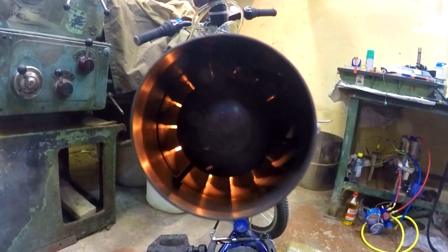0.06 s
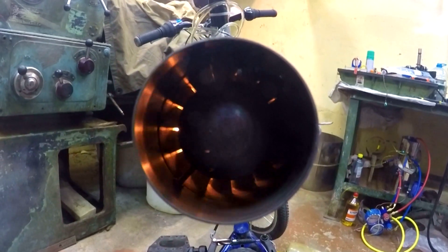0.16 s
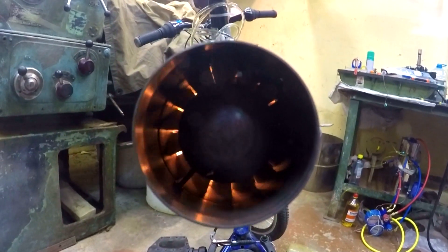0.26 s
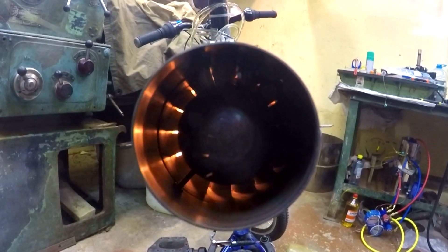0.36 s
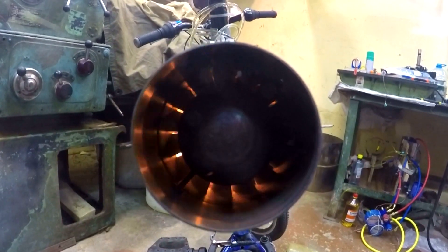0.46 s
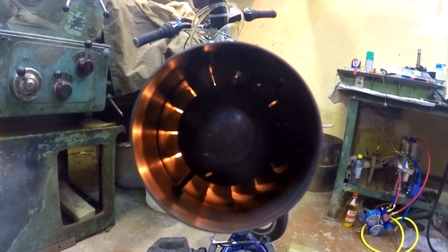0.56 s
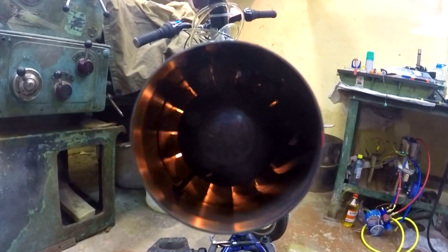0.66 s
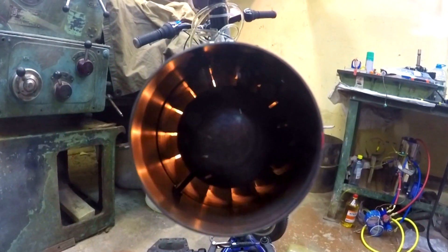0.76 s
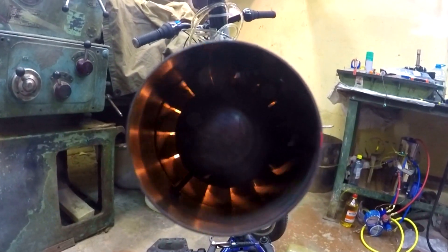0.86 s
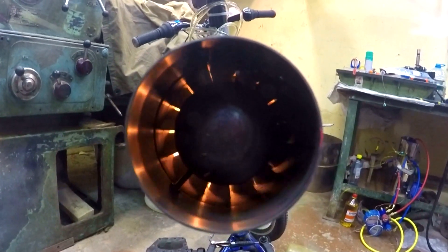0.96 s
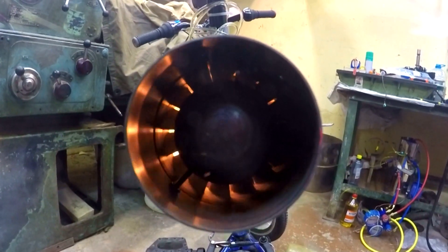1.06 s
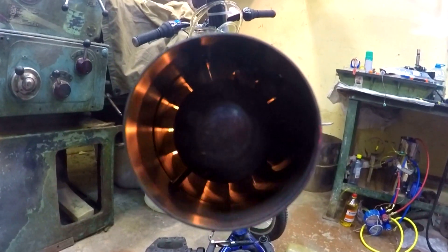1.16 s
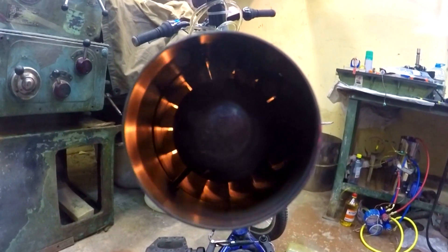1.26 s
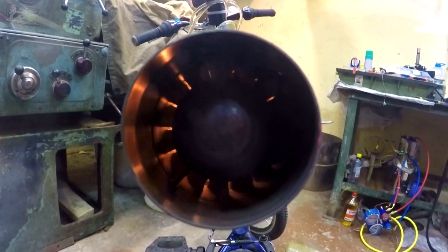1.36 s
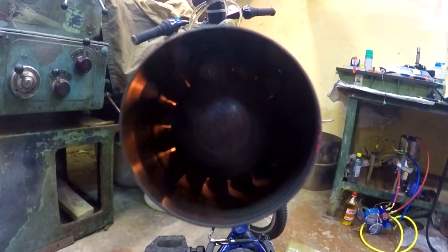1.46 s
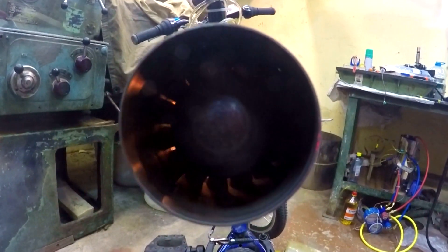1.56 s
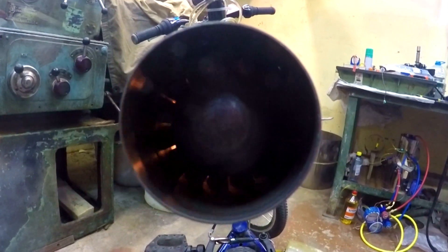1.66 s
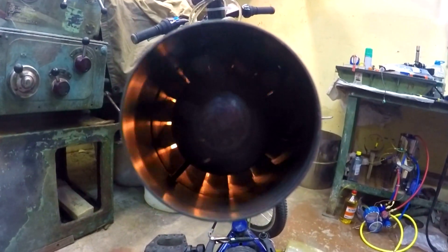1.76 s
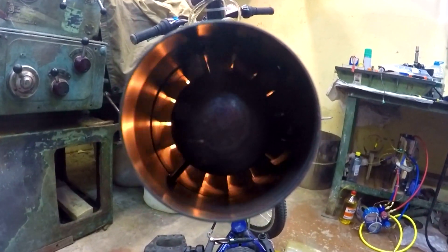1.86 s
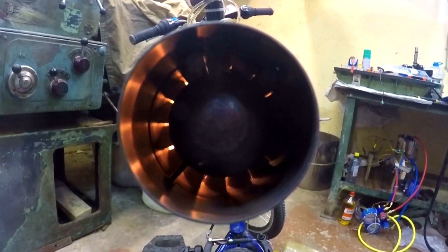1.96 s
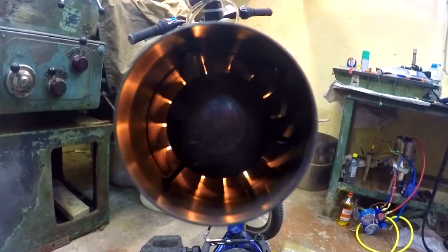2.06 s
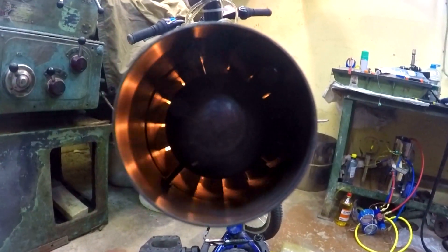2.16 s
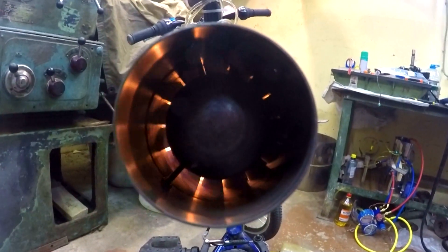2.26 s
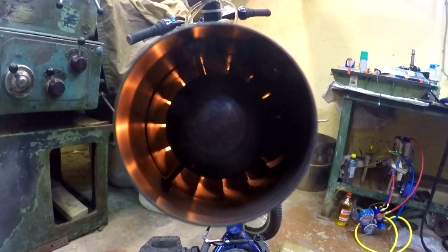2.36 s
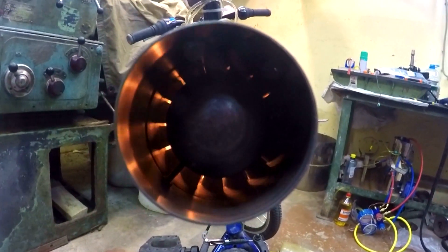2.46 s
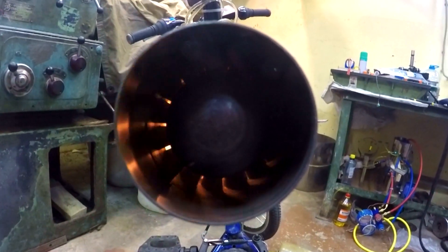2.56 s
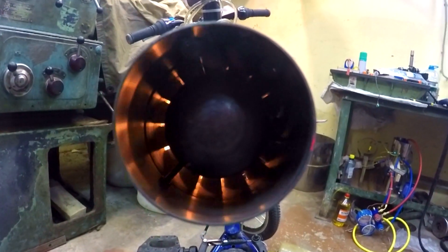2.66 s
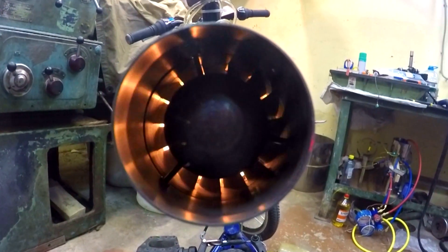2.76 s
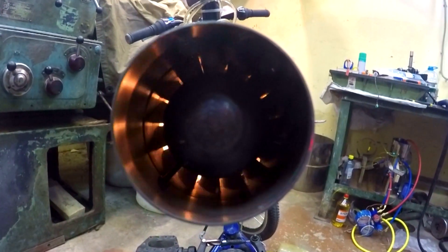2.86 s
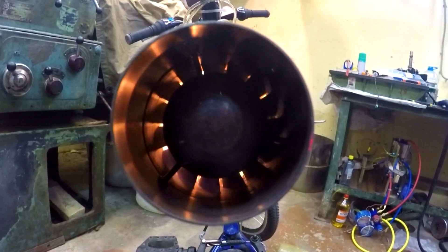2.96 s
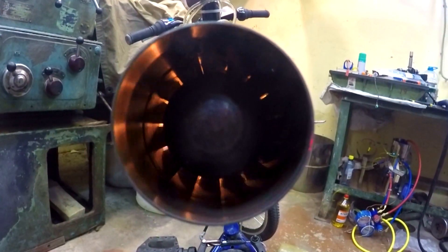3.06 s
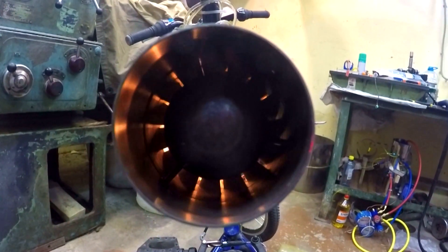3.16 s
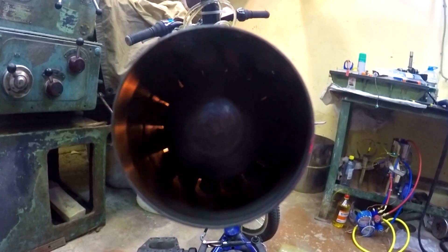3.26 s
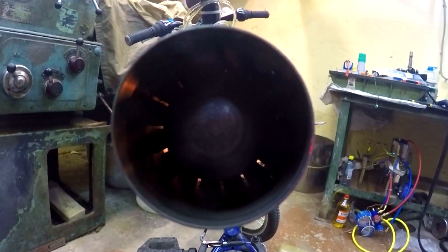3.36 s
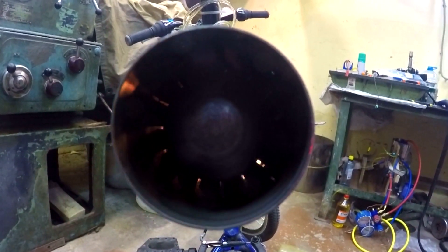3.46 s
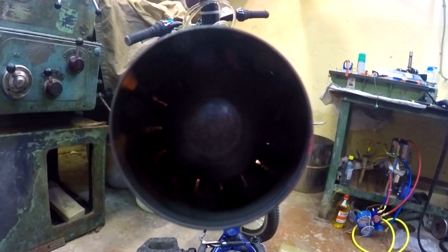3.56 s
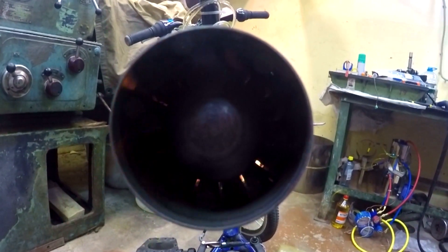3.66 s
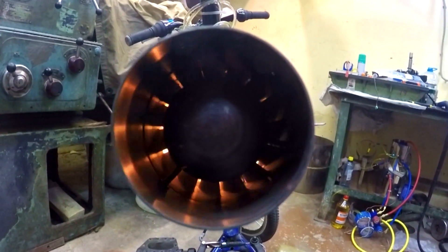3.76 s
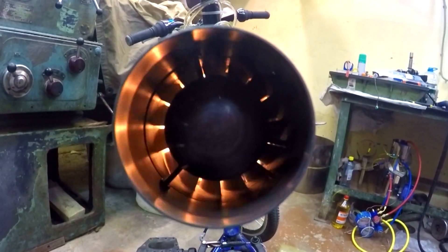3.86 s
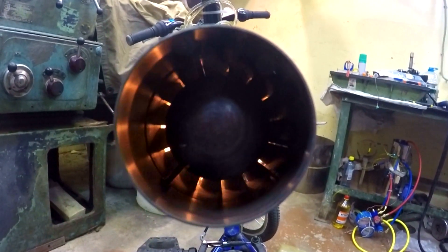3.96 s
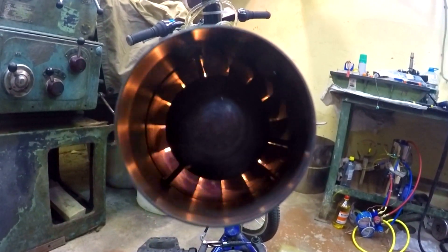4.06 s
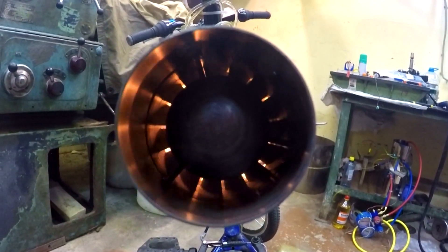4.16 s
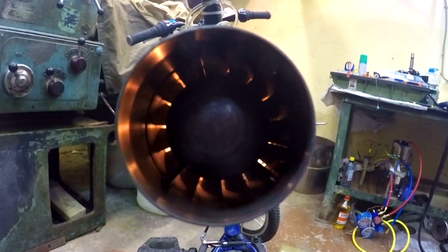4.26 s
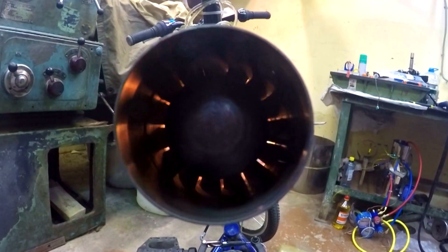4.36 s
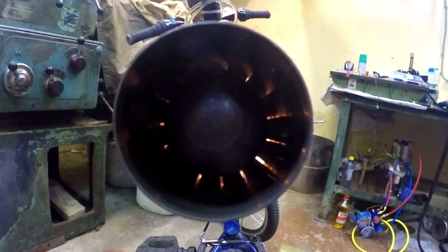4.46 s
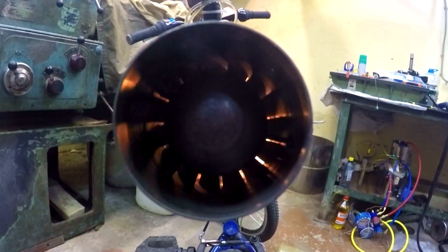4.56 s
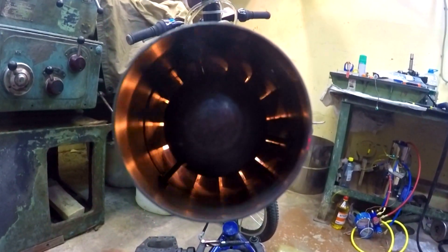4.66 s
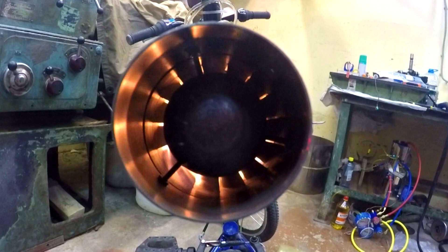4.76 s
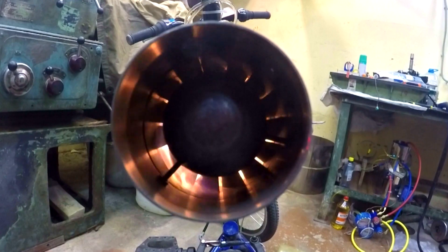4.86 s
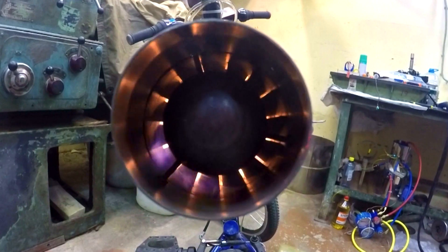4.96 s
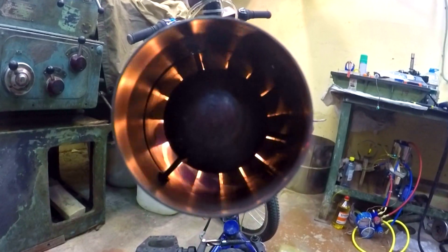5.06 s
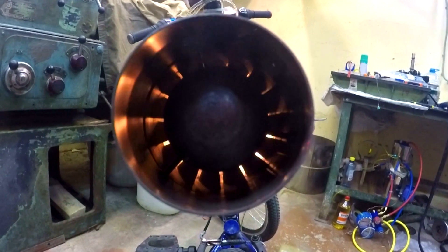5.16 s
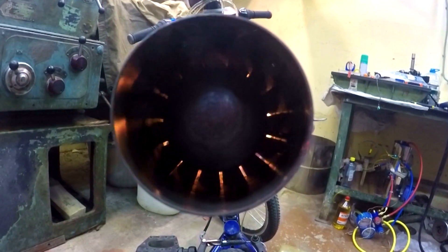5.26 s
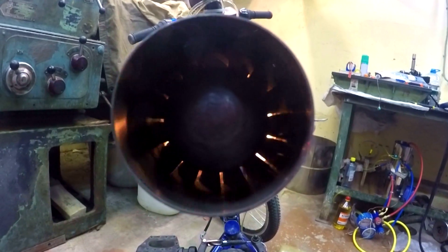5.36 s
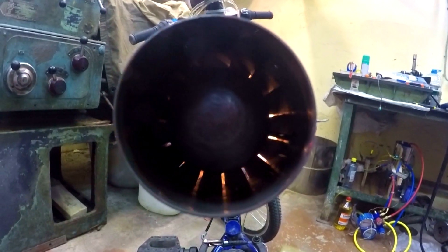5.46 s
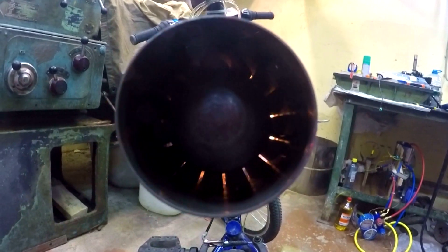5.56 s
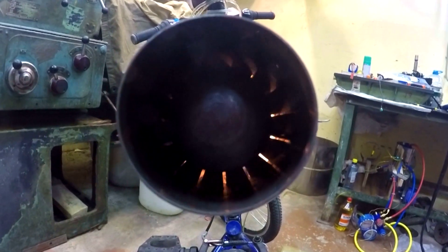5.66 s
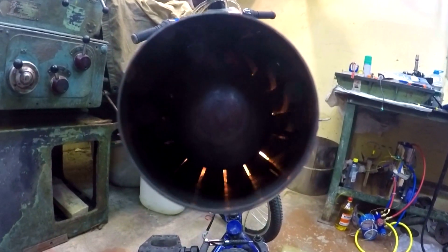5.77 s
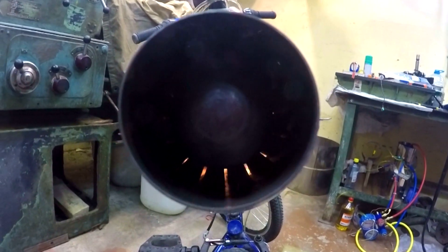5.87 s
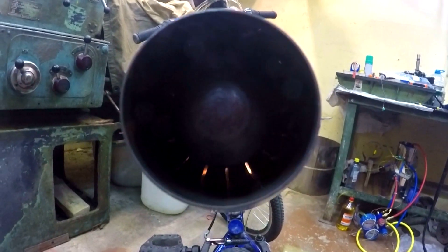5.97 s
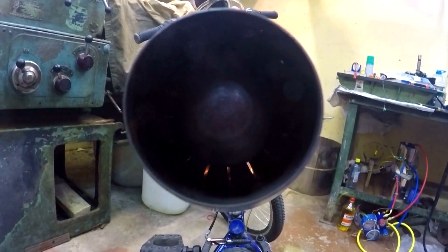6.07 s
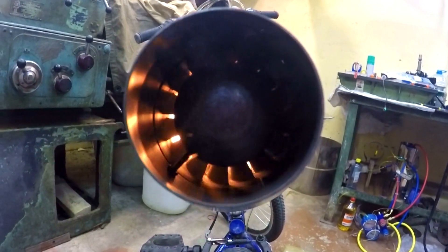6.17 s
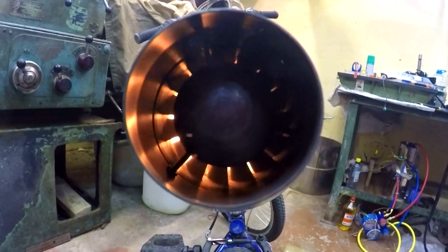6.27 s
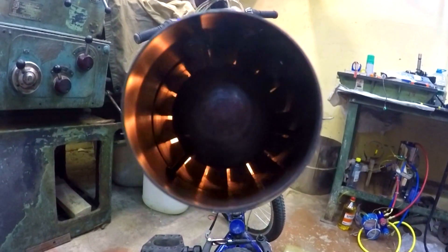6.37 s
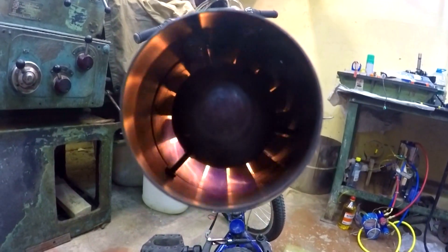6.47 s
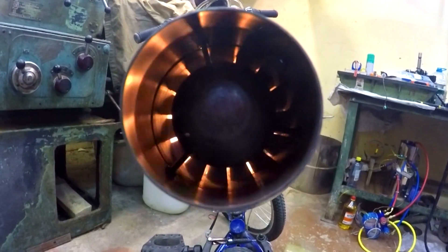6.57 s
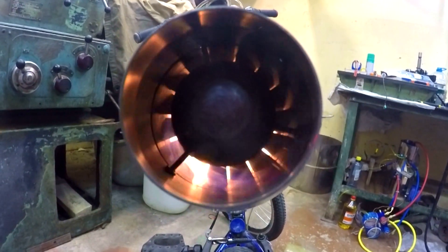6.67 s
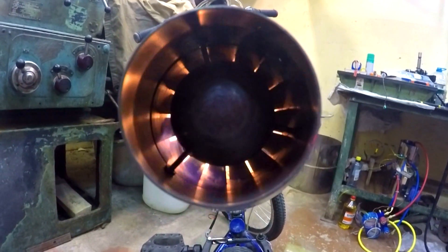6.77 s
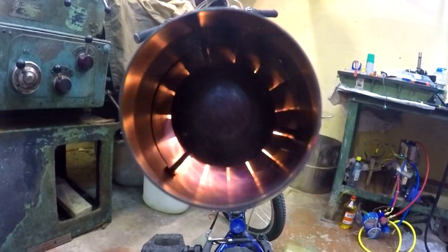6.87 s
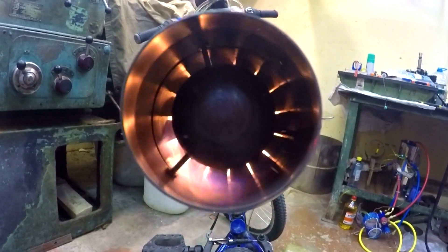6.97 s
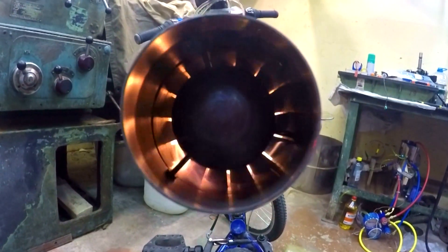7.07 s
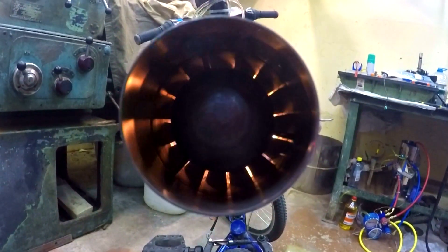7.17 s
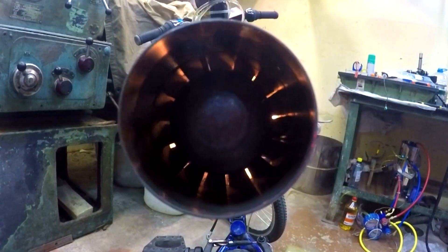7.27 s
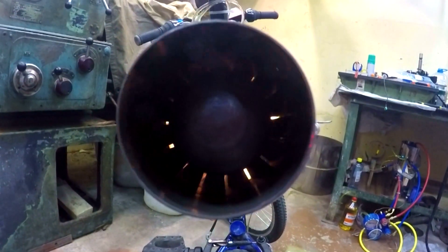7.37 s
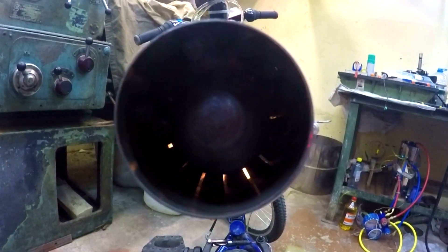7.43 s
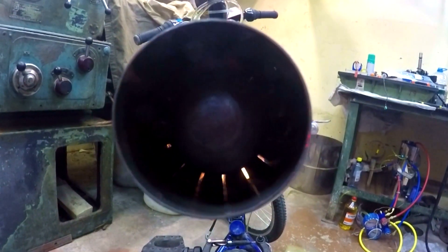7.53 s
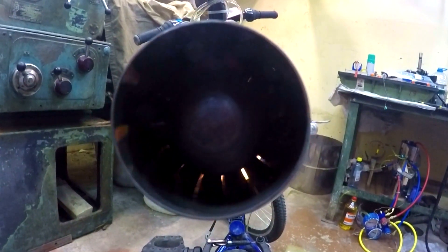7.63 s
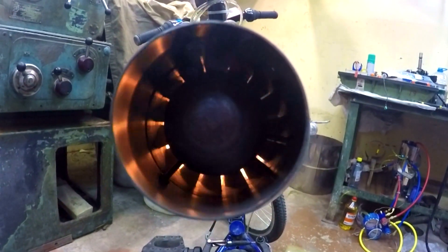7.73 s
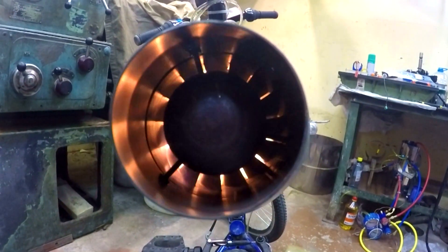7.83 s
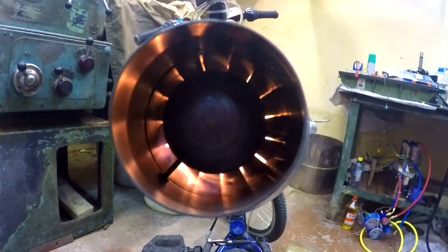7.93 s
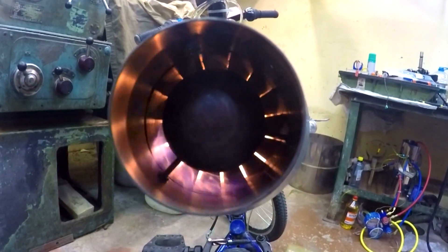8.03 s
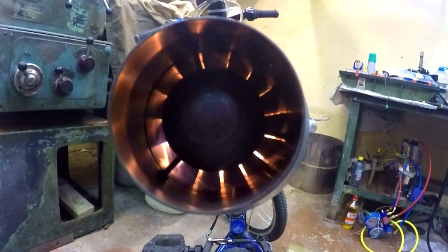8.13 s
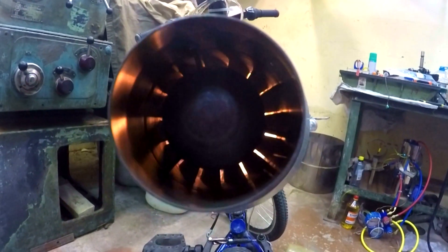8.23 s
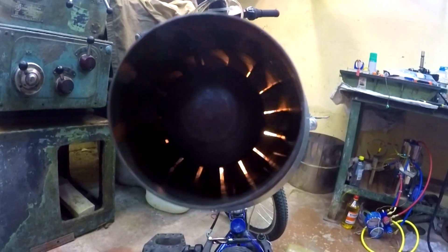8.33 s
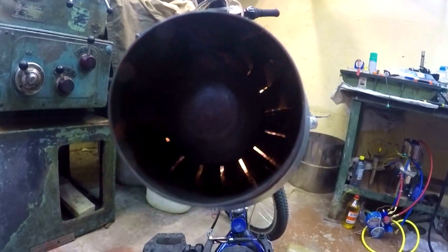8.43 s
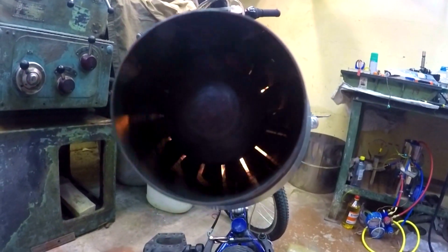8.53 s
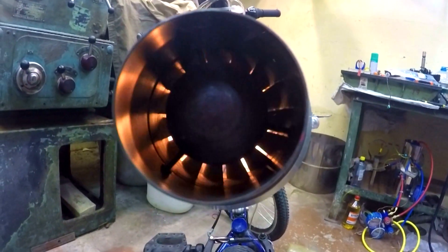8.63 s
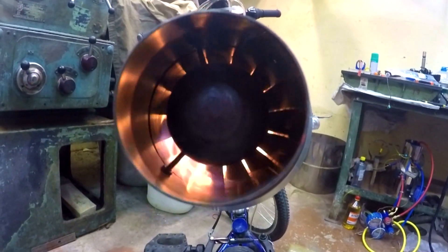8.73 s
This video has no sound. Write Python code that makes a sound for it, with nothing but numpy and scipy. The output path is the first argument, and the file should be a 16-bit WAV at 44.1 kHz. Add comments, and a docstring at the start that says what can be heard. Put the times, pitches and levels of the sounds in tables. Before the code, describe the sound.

Tail-pipe roar of a small jet engine pulses and swells indoors, with a piercing rising whine, rushing air and faint igniter ticks.

```python
"""Small turbine engine spooling up

A small turbine engine speeds up in a workshop, heard from behind its tail pipe. The flame is noise through a
moving pipe resonance plus wider noise bands. The rotor whines on multiples of the shaft speed, a ball bearing
sings as a train of clicks, rushing air is coloured noise, and an igniter ticks with short noise bursts.
An automatic gain control turns everything down when the sound surges."""
import sys
import numpy as np
from scipy import signal
from scipy.fft import rfft, irfft, next_fast_len
from scipy.io import wavfile
from scipy.ndimage import uniform_filter1d

SR = 44100
rng = np.random.default_rng(int(sys.argv[2]) if len(sys.argv) > 2 else 0)


def wav_out(sig):
    """Save sig, one row per channel (or a flat mono array), as 16-bit PCM at SR to the path in sys.argv[1]."""
    wavfile.write(sys.argv[1], SR, np.round(np.clip(np.atleast_2d(sig).T, -1, 1) * 32767).astype(np.int16))


N = 388080  # samples, 8.8 s

# speed of the shaft: t/s, speed/(turns/s)
SHAFT_SPEED = [(0.0, 57.88), (0.3, 60.55), (0.7, 64.15), (1.0, 66.28), (1.4, 68.68), (1.8, 70.33),
               (2.3, 72.66), (2.7, 74.1), (3.15, 76.1), (3.8, 77.05), (4.25, 78.62), (4.65, 79.27),
               (5.25, 81.5), (5.8, 82.13), (6.25, 81.7), (6.8, 83.08), (7.25, 85.2), (7.8, 84.5),
               (8.3, 86.0), (8.8, 85.5)]
FULL_TURNS = 85  # turns/s at which the air levels are stated

# colour of the air in the duct, in the throat and in the compressor hiss: f/Hz, level/dB
DUCT_COLOUR = [(500, -120), (900, -0.5), (1180, -2), (1300, 0), (1450, -3.5), (1560, -6.5), (1750, -21),
               (2000, -23), (3000, -120)]
THROAT_COLOUR = [(1300, -120), (1900, -2.5), (2150, -2.5), (2350, 1.5), (2650, -6.5), (3100, -3),
                 (3400, -8.5), (3800, -4), (4100, -3), (5000, -120)]
HISS_COLOUR = [(2500, -120), (3300, 7.5), (3700, 7), (4100, 5.5), (4500, 4.5), (5000, 8.5), (5600, 3),
               (6200, 1), (7500, -2), (8100, -3.5), (9500, -4), (11000, -7.5), (13000, -9.5),
               (15200, -12.5)]
# loudness of each kind of air before the room: level/dB at full speed, growth/(dB per dB of shaft speed)
DUCT_LEVEL = (-44.5, 2.65)
THROAT_LEVEL = (-53.5, 2.75)
HISS_LEVEL = (-56.5, .1)

# igniter sparks, level before colouring: t/s, level/dB
SPARKS = [(.135, -60), (0.356, -57), (.578, -54.5), (.80, -64.5), (1.022, -55), (1.245, -65), (1.69, -55.5),
          (1.915, -57), (2.135, -56), (2.361, -69), (2.578, -60), (2.80, -61), (3.69, -67), (3.91, -54),
          (4.56, -57), (4.79, -61), (6.13, -60.5), (6.35, -59.5), (6.56, -54), (6.79, -66), (7.47, -62),
          (8.56, -57)]
# colour of a spark: f/Hz, level/dB
SPARK_COLOUR = [(1000, -120), (2000, 3.5), (3300, 10), (5000, -5.5), (8000, -1), (11000, -9.5),
                (13000, -18.5), (16000, -30.5)]

# colour of the ringing bearing: f/Hz, level/dB
BEARING_COLOUR = [(2500, -120), (4000, -1), (5500, 0), (7000, -6.5), (9000, -2), (11000, -9),
                  (13000, -13.5), (15500, -16)]
BALL_ORDER, BALLS = 4.241, 10  # balls passing the flaw per shaft turn, balls in the cage

# the strongest rotor tone, order 60, between its dropouts: t/s, level/dB
WHINE = [(0, -48), (.5, -51.5), (.95, -50), (1.35, -50), (2.0, -53), (2.65, -49), (3.4, -52), (3.85, -46.5),
         (4.5, -51), (4.8, -49), (5.05, -53.5), (5.55, -45.5), (5.85, -56), (6.2, -44.5), (6.9, -48),
         (7.1, -46), (7.8, -40), (8.05, -46), (8.4, -51.5), (8.6, -48), (8.8, -54)]
# the half-pitch rotor tone, order 30: t/s, level/dB
HALF_WHINE = [(0, -71), (.55, -66), (1.1, -59), (1.35, -75), (2.5, -71), (2.95, -55), (3.2, -66),
              (3.7, -52.5), (4.15, -71), (4.55, -59), (5.3, -63), (6.05, -52), (6.4, -58), (6.9, -74),
              (7.25, -73), (7.5, -57), (7.75, -58), (8.0, -78), (8.5, -63), (8.8, -75)]
# brief dropouts of the strongest tone: t/s, length/s
DROPOUTS = [(.13, 0.018), (0.258, .02), (0.348, 0.041), (.439, 0.015), (.559, .02), (0.65, 0.03),
            (.778, 0.018), (1.157, 0.02), (1.26, 0.034), (1.707, 0.017), (1.89, 0.063), (2.07, 0.018),
            (2.18, .05), (2.375, .02), (2.567, 0.032), (2.7, 0.018), (2.803, 0.034), (2.993, .05),
            (3.696, 0.095), (3.885, .03), (4.14, 0.034), (4.347, 0.045), (4.613, .04), (4.714, 0.018),
            (5.049, .03), (5.168, 0.026), (5.333, 0.042), (5.74, .07), (6.51, 0.023), (6.733, .04),
            (6.81, .02), (6.9, .02), (7, .04), (7.9, 0.038), (8.174, .06), (8.33, 0.027), (8.436, 0.033),
            (8.516, .03), (8.71, 0.044)]
DROPOUT_DEPTH = 0.81  # share of the tone that is lost
GRAIN = 0.066  # fast unsteadiness of the whine per turn-per-s gained each second
# weaker rotor tones: order/(cycles per shaft turn)
TONE_ORDERS = (1, 46, 47, 48, 72, 90)
# their levels before resonance, flame and fading act: level/dB
TONE_LEVELS = (-50.5, -74.5, -74.5, -73, -81.5, -77.5)
# how far the flame turns them down (negative: up): loss/(dB per dB of flame)
TONE_DUCK = (.5, -0.67, 0.18, 0.099, -0.073, 0.25)
# resonances that lift a weaker tone as it glides through, low ones in the workshop, high ones in the casing:
# f/Hz, width/Hz, lift/dB
TONE_LIFTS = [(67.4, 4, 1.5), (82.9, 3, 10), (77.3, 2, 5), (4100, 40, 9), (3640, 40, 13), (3750, 50, 14.5),
              (3844, 63, 12.5), (3935, 50, 18.5), (5000, 60, 8), (5420, 360, 14.5), (5936, 80, 17)]
# faint rotor tones: order/(cycles per shaft turn)
FAINT_ORDERS = (23, 42, 45, 59, 66, 78, 84, 96, 102, 108)
# their average levels: level/dB
FAINT_LEVELS = (-78, -82, -78.5, -69.5, -80.5, -84.5, -80.5, -79.5, -79, -84.5)
# a thin whistle that fades as the engine speeds up: f/Hz at the start, rise/(Hz/s), level/dB, gone by/s
WHISTLE = (3772, 17, -64, 4.2)

# the flame; hotter gas means a higher resonance: t/s, strength/dB, pipe resonance f/Hz
FLAME = [(0.0, -26, 363), (0.19, -30.5, 362), (0.32, -26.5, 364), (0.42, -30, 357), (0.55, -22, 338),
         (0.73, -24.5, 375), (0.88, -26, 352), (0.98, -21.5, 381), (1.1, -26, 350), (1.18, -20.5, 355),
         (1.37, -28.5, 347), (1.75, -29, 345), (1.84, -22.5, 365), (2.13, -22, 387), (2.2, -25, 367),
         (2.37, -20.5, 392), (2.46, -22.5, 357), (2.62, -27.5, 356), (2.72, -20.5, 385), (3.0, -18.5, 395),
         (3.19, -20, 380), (3.33, -25.5, 367), (3.62, -24.5, 352), (3.92, -19.5, 384), (4.16, -18.5, 411),
         (4.29, -18.5, 378), (4.55, -22.5, 363), (4.75, -16, 414), (4.85, -18.5, 403), (4.97, -17, 426),
         (5.29, -21, 383), (5.41, -19.5, 374), (5.61, -18.5, 386), (5.96, -24, 355), (6.2, -25.5, 362),
         (6.3, -18.5, 395), (6.4, -21, 378), (6.55, -15.5, 416), (6.89, -16.5, 440), (7.13, -16.5, 438),
         (7.2, -18.5, 405), (7.45, -23, 380), (7.74, -22.5, 385), (7.87, -15, 422), (8.12, -15.5, 417),
         (8.55, -21.5, 365), (8.73, -13, 405), (8.8, -15, 433)]
FULL_DB, COOL_HZ = -17, 350  # flame strength and pipe resonance at which the roar levels are stated
# colour of the low, middle and upper noise of the roar: f/Hz, level/dB
RUMBLE_COLOUR = [(15, -30), (25, -5), (60, 0.5), (120, -1), (230, 4.5), (300, -3), (400, -40.5),
                 (800, -120)]
MID_COLOUR = [(200, -120), (400, -7.5), (500, -0.5), (680, -1), (800, -8.5), (1040, -17.5), (1150, -22.5),
              (1300, -30), (1600, -45.5), (3000, -120)]
UPPER_COLOUR = [(1100, -120), (1600, -9), (2000, 1), (2300, -1.5), (2900, 0), (4000, -10), (6000, -120)]
# parts of the roar: level/dB at full flame and cool pipe, growth/(dB per dB of flame),
# heat/(dB per Hz of pipe resonance), flutter/dB
PIPE_PART = (-16.5, 1.17, -0.0022, 0.26)
RUMBLE_PART = (-28, 0.83, 0.0478, 1.26)
MID_PART = (-31, 0.94, 0.0683, 0.72)
UPPER_PART = (-53, 1.05, 0.1137, 1.13)
# short bright bursts in the flame: t/s, level/dB, length/s
BURSTS = [(2.16, -53, .02), (2.37, -50, .015), (2.97, -51.5, 0.032), (4.172, -47, 0.028),
          (8.33, -51.5, 0.034)]

# standing waves of the workshop, where the listener is: f/Hz, width/Hz, boost or dip/dB
ROOM = [(57, 11, -2), (82, 7.4, 2), (93.5, 7.4, -5.5), (128.2, 6.4, -10.5), (155, 8, -1.5), (175, 12, 1),
        (190.4, 5.6, -3), (206, 8, -2.5), (263.3, 10.6, 6.5), (275, 8, 3), (321.6, 12.7, 6), (380.6, 13, 3),
        (457.7, 16, 3), (522, 21, -1.5), (558, 23, -0.5), (660, 21, 3), (753, 14, -8.5), (791, 14, 2.5),
        (831, 13, 4), (940, 22, -3), (1015, 13, 6.5), (1185, 24, -7.5), (1265, 48, 2.5), (1490, 14, -10.5),
        (1693, 20, -7.5), (2100, 36, -4.5)]
TOP_HZ = 15250  # nothing is heard from here up


def amp(db):
    """Turn dB into a plain gain."""
    return 10 ** (np.asarray(db) / 20)


def unit(x):
    """Scale x to rms 1."""
    return x / np.sqrt(np.mean(x ** 2) + 1e-20)


def along(points, hz):
    """Read a curve of (Hz, value) points on a log frequency axis."""
    f, value = np.transpose(points)
    return np.interp(np.log(hz + 1), np.log(f + 1), value)


def curves(rows, t=None):
    """One value per sample (or per time t) for each column after the time."""
    s, *columns = np.transpose(rows)
    times = np.arange(N) / SR if t is None else t
    return [np.interp(times, s, column) for column in columns]


def wobble(rate):
    """A random curve: straight lines between random knots, rate knots a second."""
    knots = int(N * rate // SR + 2)
    return np.interp(np.arange(N) * rate / SR, np.arange(knots), rng.standard_normal(knots))


def fading(rate):
    """A complex random gain of mean power 1: a tone beating with its many echoes."""
    return (wobble(rate) + 1j * wobble(rate)) * np.sqrt(3 / 4)


def filtered(x, response):
    """Multiply the spectrum of x by a response of frequency."""
    size = next_fast_len(N + SR // 2)
    return irfft(rfft(x, size) * response(np.fft.rfftfreq(size, 1 / SR)), size)[:N]


def rush(colour):
    """Noise of rms 1 with the given colour."""
    return unit(filtered(rng.standard_normal(N), lambda hz: amp(along(colour, hz))))


def echoes(x, t60, wet):
    """Direct sound plus a diffuse tail, which colours gliding tones as they cross its fine peaks."""
    t = np.arange(SR // 2) / SR
    tail = rng.standard_normal(len(t)) * amp(-60 * t / t60)  # falls 60 dB in t60 seconds
    return x + wet * signal.fftconvolve(x, tail / np.linalg.norm(tail))[:N]


def patchy(x, depth_db):
    """x with a random gain that drifts over time and frequency, scaled to rms 1."""
    z = signal.stft(x, nperseg=512)[2]
    field = uniform_filter1d(rng.standard_normal(z.shape), 3, 0)  # smooth over frequency
    field = uniform_filter1d(field, 60, 1)  # smooth over time
    return unit(signal.istft(z * amp(depth_db * unit(field)), nperseg=512)[1][:N])


def air():
    """Air rushing through the duct, the throat and the compressor, louder as the shaft speeds up."""
    speed_db = 20 * np.log10(curves(SHAFT_SPEED)[0] / FULL_TURNS)
    level = lambda db, grows: amp(db + grows * speed_db)
    throat = level(*THROAT_LEVEL) * rush(THROAT_COLOUR)
    hiss = level(*HISS_LEVEL) * rush(HISS_COLOUR)
    flow = echoes(throat + hiss, t60=0.099, wet=0.73)
    flow += level(*DUCT_LEVEL) * rush(DUCT_COLOUR)
    return np.std(flow) * amp(0.35 * wobble(6.6)) * patchy(flow, depth_db=1.25)


def igniter():
    """Each spark is heard mostly as a short burst of reflections: noise that dies away quickly."""
    out, t = np.zeros(N + SR), np.arange(SR // 5) / SR
    for s, db in SPARKS:
        shape = amp(db - 60 * t / 0.18) * (1 - np.exp(-t / .002))  # soft start, then decay
        out[round(s * SR):][:len(t)] += shape * rng.standard_normal(len(t))
    return 2.6 * filtered(out[:N], lambda hz: amp(along(SPARK_COLOUR, hz)))


def bearing(turns, count=56):
    """One click per ball passing a flaw; the load on it swells once per turn of the cage."""
    ball = BALL_ORDER * turns + .03 * wobble(16)  # phase in radians, slightly uneven
    clicks = np.sin((count + .5) * ball) / (np.sin(ball / 2) + 1e-9)  # the sum of count harmonics
    clicks = np.clip(clicks, -2 * count - 1, 2 * count + 1)
    clicks *= 1 + 1.1 * np.cos(ball / BALLS)
    ring = filtered(clicks, lambda hz: amp(along(BEARING_COLOUR, hz)))
    return amp(-64) * patchy(echoes(ring, t60=0.32, wet=4.3), depth_db=5.5)


def rotor(turns):
    """Blade and winding tones at whole multiples of the shaft speed, plus a thin rising whistle."""
    tone = lambda order, size: np.sqrt(2) * np.imag(size * np.exp(1j * order * turns))
    t, speed = np.arange(N) / SR, curves(SHAFT_SPEED)[0]
    flame_db = curves(FLAME)[0] - FULL_DB

    # slow curves are worked out at every 64th sample, then held
    dips = [1 - DROPOUT_DEPTH * np.exp(-((t[::64] - s) / long) ** 2) for s, long in DROPOUTS]
    kept = np.prod(dips, axis=0).repeat(64)[:N]
    grain = GRAIN * np.abs(np.gradient(speed) * SR) * fading(70)
    unsteady = 1 + 0.16 * fading(9) + .25 * fading(30) + grain
    out = tone(60, amp(curves(WHINE)[0]) * kept * unsteady)
    out += tone(30, amp(curves(HALF_WHINE)[0]) * (1 + .3 * fading(20)))

    for order, db, duck in zip(TONE_ORDERS, TONE_LEVELS, TONE_DUCK):
        pitch = order * speed[::64]
        lift_db = sum(up_db * np.exp(-((pitch - hz) / wide) ** 2) for hz, wide, up_db in TONE_LIFTS)
        level = amp(db + lift_db.repeat(64)[:N] - duck * flame_db)
        out += tone(order, level * (0.79 + .5 * fading(28)))

    hz, rise, db, gone_s = WHISTLE
    fade = np.clip(2 - 2 * t / gone_s, 0, 1)
    whistle = np.exp(2j * np.pi * (hz + rise * t / 2) * t)
    out += tone(0, amp(db) * fade * whistle * (1 + fading(4) / 3))  # order 0: not tied to the shaft
    return out + sum(tone(order, amp(db) * fading(5)) for order, db in zip(FAINT_ORDERS, FAINT_LEVELS))


def pipe_roar(multiple, width_hz):
    """Flame noise through one resonance of the tail pipe, which moves with the gas temperature."""
    hz, t, z = signal.stft(rng.standard_normal(N), SR, nperseg=2048, noverlap=1536)
    centre = multiple * curves(FLAME, t)[1]
    gain = 1 / (1 + ((hz[:, None] - centre) / width_hz) ** 2)
    return unit(signal.istft(z * gain, SR, nperseg=2048, noverlap=1536)[1][:N])


def flame():
    """Four parts of the roar follow flame strength and heat; all flutter together as pockets of fuel burn."""
    strength_db, pipe_hz = curves(FLAME)
    flutter = wobble(14) + wobble(45)
    pockets_db = 1.5 * wobble(8)
    strength_db = strength_db - FULL_DB + pockets_db
    heat_hz = pipe_hz - COOL_HZ
    level = lambda db, grows, heats, shakes: amp(
        db + grows * strength_db + heats * heat_hz + shakes * flutter)

    roar = level(*PIPE_PART) * pipe_roar(1, width_hz=57.6)
    roar += level(*RUMBLE_PART) * rush(RUMBLE_COLOUR)
    roar += level(*MID_PART) * rush(MID_COLOUR)
    t = np.arange(N) / SR
    bursts = sum(amp(db) * np.exp(-((t - s) / long) ** 2) for s, db, long in BURSTS)
    upper = pipe_roar(4.07, width_hz=210) + 0.48 * rush(UPPER_COLOUR)
    return roar + (level(*UPPER_PART) + bursts) * upper


def scene():
    """The engine in the workshop; standing waves colour the flame and the air."""
    turns = 2 * np.pi * np.cumsum(curves(SHAFT_SPEED)[0]) / SR  # shaft angle in radians
    standing = lambda hz: amp(sum(db * np.exp(-((hz - c) / w) ** 2) for c, w, db in ROOM))
    coloured = filtered(air() + flame(), standing)
    return (coloured + igniter() + bearing(turns) + rotor(turns))[None]


def record(dry):
    """Gain control turns the sound down as its mean power rises; then the highest treble is cut off."""
    power = uniform_filter1d(dry[0] ** 2, int(.12 * SR))
    power = np.abs(uniform_filter1d(power, int(.07 * SR)))
    gain = (1 + power / amp(-13.0) ** 2) ** -.35  # bends around a mean level of -13 dB
    return filtered(dry[0] * gain, lambda hz: hz < TOP_HZ)[None]


dry = scene()
out = record(dry)
wav_out(out)
```